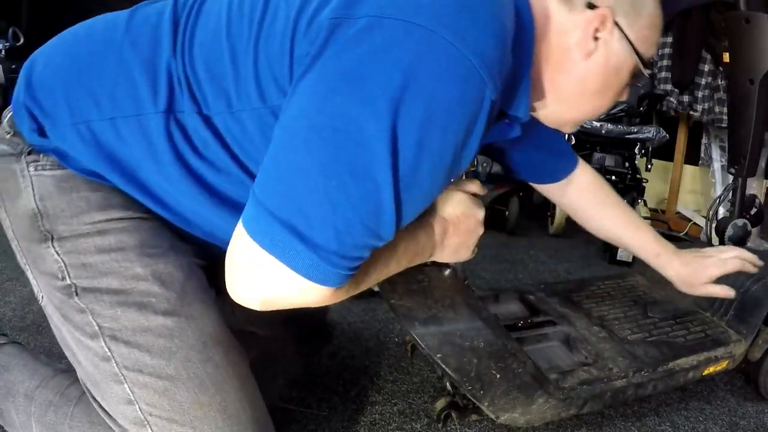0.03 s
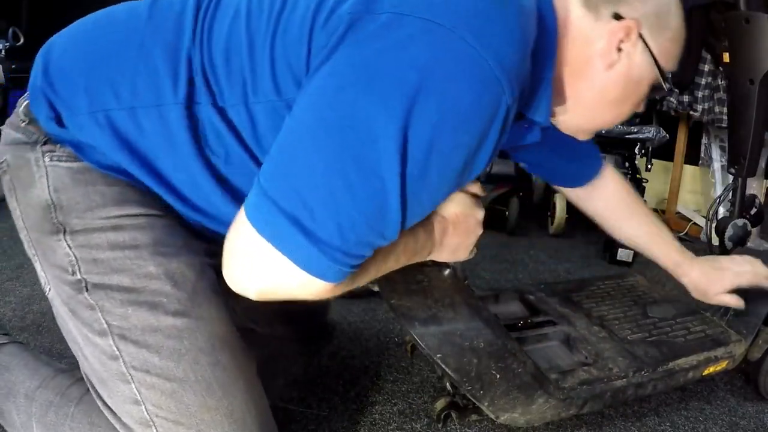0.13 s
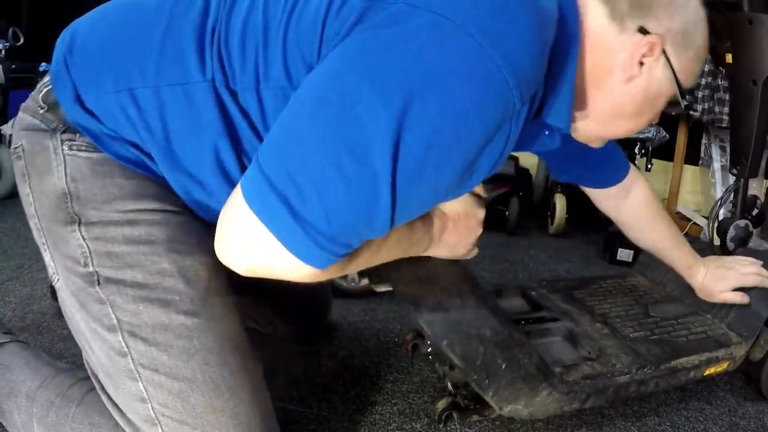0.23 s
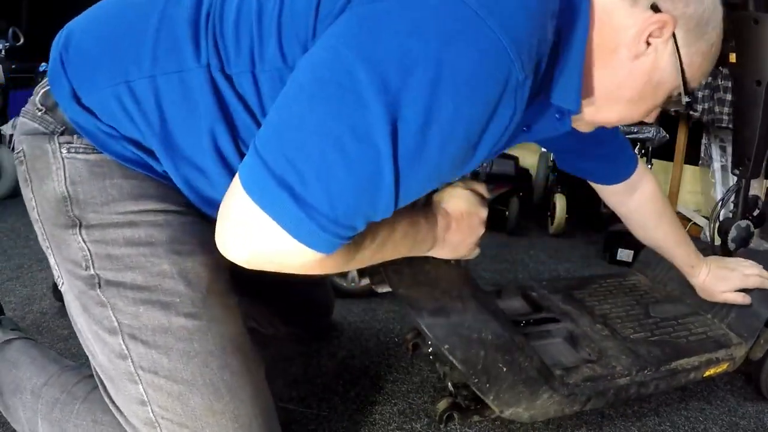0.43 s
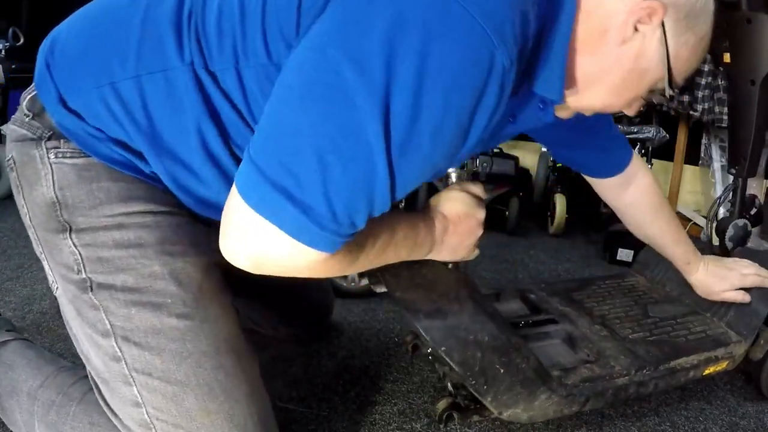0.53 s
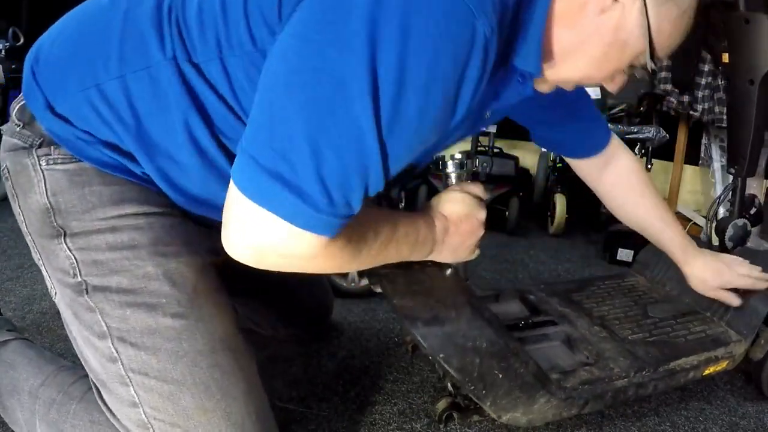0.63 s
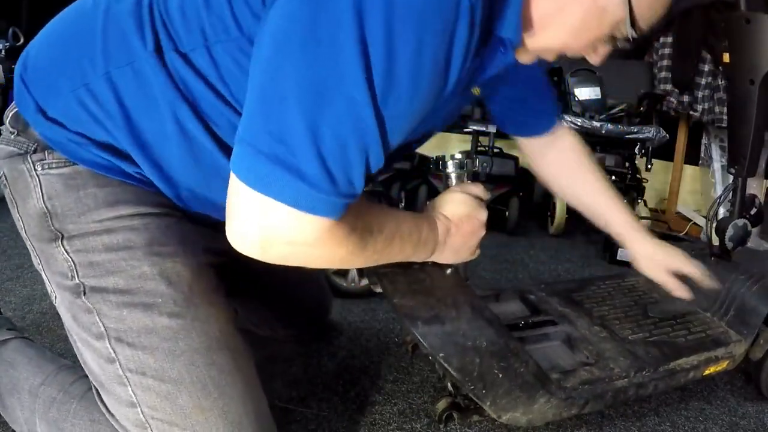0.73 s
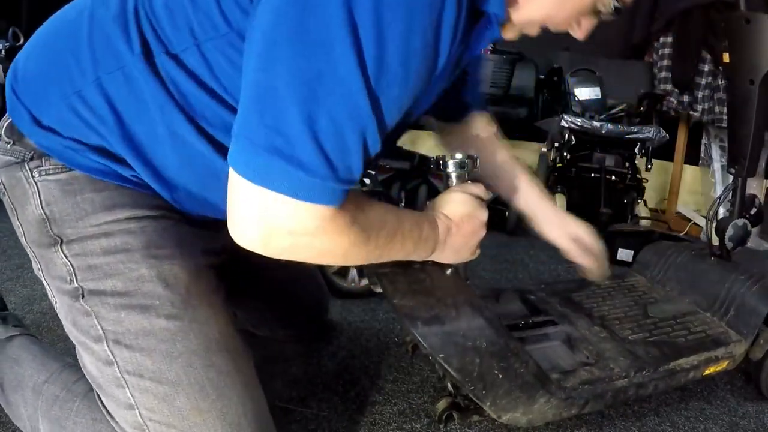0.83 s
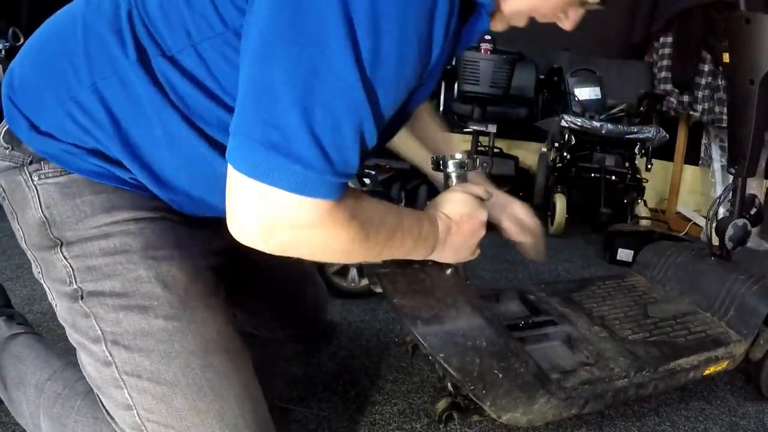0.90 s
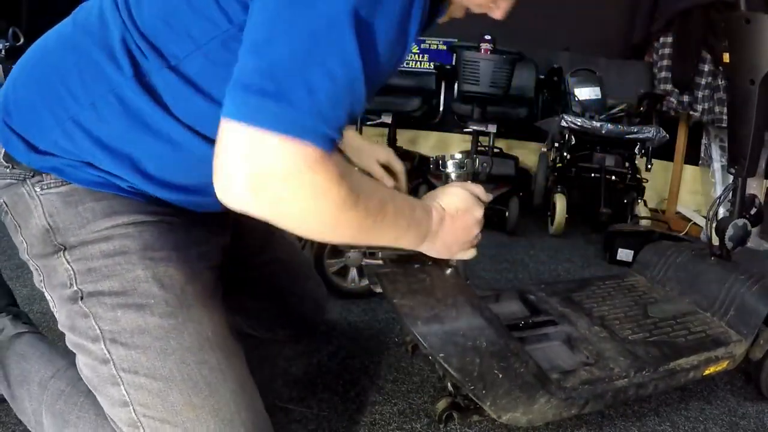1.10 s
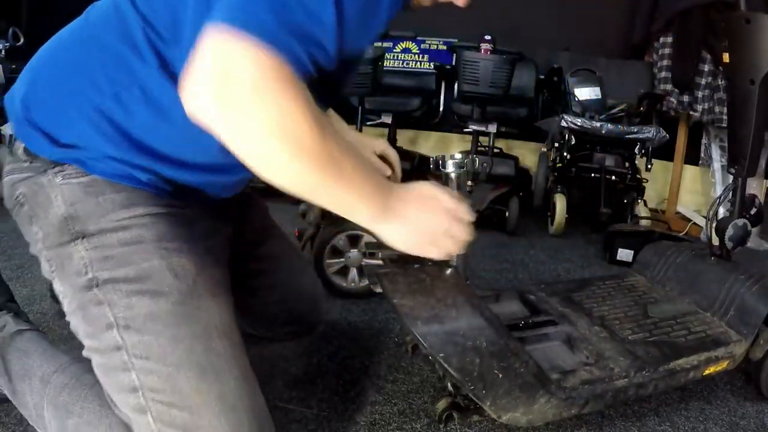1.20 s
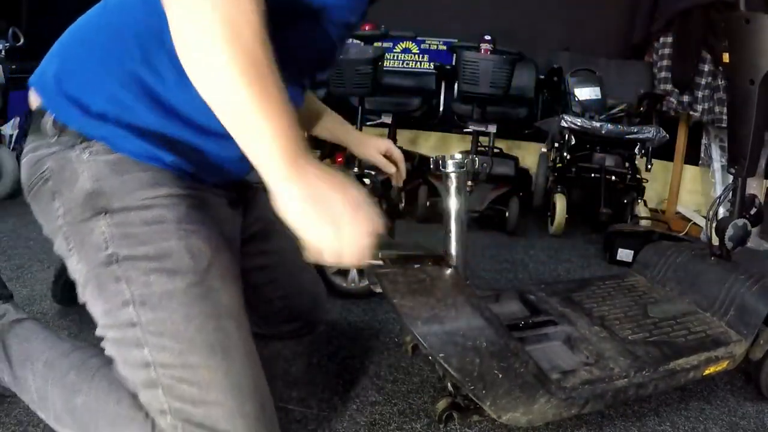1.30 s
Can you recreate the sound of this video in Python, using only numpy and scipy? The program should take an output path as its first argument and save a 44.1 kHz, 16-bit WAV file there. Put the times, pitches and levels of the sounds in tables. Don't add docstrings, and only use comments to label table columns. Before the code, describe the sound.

A loud, hard knock on a metal and plastic scooter deck at 0.23 seconds, with rapid rebounds, short hollow ringing, low wobble and rattling parts. Pins tick near 0.42; a latch clacks at 0.63. A hand swishes softly off rubber around 0.7, a tube drags faintly and seats with a dull thud at 1.09, then light nudges and cloth rustle. Close stereo, low workshop room noise.

```python
import sys
import numpy as np
from scipy import signal
from scipy.fft import rfft, irfft
from scipy.io import wavfile
from scipy.ndimage import uniform_filter1d

SR = 44100
rng = np.random.default_rng(int(sys.argv[2]) if len(sys.argv) > 2 else 0)


def waveform_to_disk(signal):
    frames = np.transpose(np.atleast_2d(signal))
    scaled = np.clip(frames, -1, 1) * 32767
    samples = np.round(scaled).astype(np.int16)
    wavfile.write(sys.argv[1], SR, samples)


def ratio_of_db(decibels):
    return 10 ** (np.asarray(decibels, float) / 20)


N = 59535

# start [s], strength [dB], hardness [dB/octave].
BLOWS = [(.2282, -13, 0.5), (.2297, -7.5, -2), (.234, -17, -1), (.2375, -20, 4), (.2475, -30, -1),
         (.2545, -20, 1), (.265, -14.5, -4.5), (.285, -36, -12), (.309, -54, -16), (.326, -26, -7.5),
         (.447, -40, -1), (.472, -36.5, -9)]
# frequency [Hz], spectrum [dB per Hz].
METAL_CRACK = [(300, -46), (700, 14.5), (1500, 18.5), (4500, -15), (9000, -39), (16000, -71)]
TIME_S = np.arange(N) / SR


def evened(x):
    return x / np.sqrt(np.mean(x ** 2) + 1e-20)


def read(points, hz):
    f, value = np.transpose(points)
    return np.interp(np.log(hz + 1), np.log(f + 1), value)


def coloured(x, points, tilt_db=0):
    hz = np.fft.rfftfreq(len(x), 1 / SR)
    gain_db = read(points, hz) + tilt_db * np.log2((hz + 60) / 1000)
    return evened(irfft(rfft(x) * ratio_of_db(gain_db), len(x)))


def ring(x, peaks):
    out = np.zeros(len(x))
    for hz, width_hz, db in peaks:
        r = np.exp(-np.pi * max(width_hz, 3) / SR)
        w = 2 * np.pi * hz / SR
        out += ratio_of_db(db) * signal.lfilter([(1 - r) * np.sin(w)], [1, -2 * r * np.cos(w), r * r], x)
    return out


def level(curve):
    s, db = np.transpose(curve)
    s = np.r_[s[0] - .03, s, s[-1] + .03]
    db = np.r_[-110, db, -110]
    return ratio_of_db(np.interp(TIME_S, s, db))


def gritty(per_s, spread_db):
    slips = rng.standard_normal(N) * (rng.random(N) < per_s / SR)
    return slips * ratio_of_db(spread_db * np.minimum(rng.exponential(1, N), 4))


def knocks(rows, modes, crack, crack_db, crack_s, rise_s, room_db, push=1, flip=1):
    out = np.zeros(N + SR)
    t = np.arange(SR // 2) / SR
    hz, width_hz, mode_db = np.transpose(modes)[:, :, None]
    sign = flip ** np.arange(len(hz))[:, None]
    decaying = np.exp(-np.pi * width_hz * t) * np.sin(2 * np.pi * hz * t)
    for s, db, hard_db in rows:
        spot_db = rng.standard_normal(hz.shape)
        size = sign * ratio_of_db(mode_db + spot_db + hard_db * np.log2(hz / 1000))
        body = (size * decaying).sum(0)
        body = push * body / abs(body).max()
        burst = coloured(rng.standard_normal(len(t)), crack, hard_db) * np.exp(-t / crack_s)
        at = round(s * SR)
        out[at:at + len(t)] += ratio_of_db(db) * (body + ratio_of_db(crack_db) * burst) * np.minimum(t / rise_s, 1)
    return out[:N] + ratio_of_db(room_db) * shop(out[:N])


def swelling_tones(rows, rise_s):
    s, db, hz, t60_s = np.transpose(rows)[:, :, None]
    t = np.maximum(TIME_S - s, 0)
    envelope = ratio_of_db(db - 60 * t / t60_s) * (1 - np.exp(-t / rise_s))
    return (envelope * np.sin(2 * np.pi * hz * t)).sum(0)


def deck_blow():
    # mode [Hz], width [Hz], level [dB].
    deck = [(154, 15, -10.5), (217.6, 24, 0.5), (265, 44, -5.5), (304, 8.6, -3), (371, 42, 5.5),
            (491, 37, -6), (724, 130, -26), (840, 100, -19), (930, 31, -33), (1687, 110, -6),
            (1950, 200, 3), (2280, 120, -22), (5860, 510, -18)]
    # frequency [Hz], spectrum [dB per Hz].
    deck_crack = [(300, -12), (600, 5), (2400, 1.5), (3200, 0), (6200, -6), (10000, -17), (16000, -38)]
    return knocks(BLOWS, deck, deck_crack, crack_db=-5.5, crack_s=0.0059, rise_s=0.00092,
                  room_db=-4.0, flip=-0.93)


def deck_wobble():
    # start [s], strength [dB], frequency [Hz], t60 [s].
    bounces = [(0.249, -2.5, 50.8, 0.2), (.2675, 3, 49.4, 0.033), (0.358, -11.5, 46, 0.25),
               (.405, -14, 47.8, 0.37), (0.497, -13, 49, 0.31), (0.586, -19, 44.6, 0.7),
               (0.676, -34, 37.3, 0.55), (0.732, -21, 50.4, 0.17), (0.787, -25, 40, 0.29),
               (0.918, -32, 37.1, 0.94), (1.093, -21.5, 39.3, 0.25), (1.146, -24.5, 73.8, 0.35),
               (1.301, -32.5, 57.7, 0.47)]
    return swelling_tones(bounces, rise_s=0.0087)


def loose_pings():
    # start [s], strength [dB], frequency [Hz], t60 [s].
    notes_struck = [(.2282, -6, 2300, 0.015), (.2285, -33, 4530, 0.017), (.2315, -18, 6030, 0.02),
                    (.232, -22, 4760, 0.024), (.2317, -13, 317, 0.043), (.232, -18.5, 1088, 0.061),
                    (.232, -20.5, 736, 0.13), (.2375, -22, 4520, 0.022), (.243, -9, 395, 0.088),
                    (.257, -20.5, 1950, 0.052), (.265, -25.5, 2750, 0.033), (.282, -34, 250, .1),
                    (.2345, -18, 270, 0.17), (.25, -24.5, 536, 0.16), (.27, -46, 626, 0.12),
                    (.233, -23, 2224, 0.036), (.236, -21, 1720, 0.053), (.352, -36, 400, 0.18),
                    (.4205, -40, 1866, 0.089), (.4225, -42, 2070, 0.032), (.4215, -40, 3210, 0.029),
                    (.431, -40.5, 2615, 0.048), (.432, -44.5, 4700, .04), (.4445, -44, 2040, 0.042),
                    (.4515, -40, 2340, 0.028), (.462, -36.5, 2600, 0.021), (.6335, -47, 2860, 0.026),
                    (.643, -34, 2780, 0.036), (.654, -30.5, 1520, 0.046), (.655, -29.5, 469.4, 0.16),
                    (.66, -38.5, 274, 0.11), (.585, -41, 174, 0.13), (.693, -38, 1550, 0.051),
                    (.696, -52, 3750, .04), (.711, -44, 4200, 0.056), (.713, -50, 1550, 0.084),
                    (.717, -45, 3920, 0.04), (.721, -49, 4150, 0.033), (.73, -47, 2720, .08),
                    (.8848, -40, 4320, 0.014), (.8848, -42.5, 3750, 0.016), (.885, -54, 2220, 0.027),
                    (.921, -51, 4200, 0.033), (.933, -52, 4080, 0.026), (.957, -58, 4220, 0.11),
                    (1.088, -48, 3390, 0.046), (1.089, -48, 2800, 0.038), (1.088, -59, 4650, 0.037),
                    (1.089, -46, 1053, 0.045)]
    return swelling_tones(notes_struck, rise_s=0.0018)


def rattle():
    # time [s], level [dB].
    shaking = [(.3, -22), (.36, -35.5), (.43, -35.5), (.46, -26.5), (.62, -48.5), (.67, -31), (.74, -33),
               (.79, -34), (.9, -41.5), (1.06, -58), (1.35, -49.5)]
    # resonance [Hz], width [Hz], level [dB].
    rattlers = [(71.5, 4.8, 12), (97.3, 20.6, 4.5), (154, 26, 2.5), (234, 6.9, -7), (306.5, 47, -4.5),
                (403, 45, -7.5), (483.7, 15, -1.5)]
    return level(shaking) * evened(ring(gritty(1500, 0.48), rattlers))


def latch_clack():
    # start [s], strength [dB], hardness [dB/octave].
    clacks = [
        (.6332, -17, -1),
        (.643, -43, 11),
        (.6525, -25.5, 11.5),
        (.6575, -23, -10),
        (.661, -28, -2),
        (.677, -35, -23),
    ]
    # mode [Hz], width [Hz], level [dB].
    latch = [(432, 38, -5.5), (668, 76, 2.5), (724, 35, -4.5), (1092, 89, -9), (1460, 21, -13),
             (1950, 37, -9.5), (2960, 190, -6.5), (3920, 230, -8)]
    return knocks(clacks, latch, METAL_CRACK, crack_db=-8.5, crack_s=0.0053, rise_s=0.00096, room_db=-6.5)


def tube_thud():
    # start [s], strength [dB], hardness [dB/octave].
    thuds = [
        (1.0872, -15, -1),
        (1.103, -34.5, -7.5),
        (1.118, -32.5, -4),
        (1.152, -29, -5),
        (1.327, -37.5, 5),
        (1.347, -30, 2),
    ]
    # mode [Hz], width [Hz], level [dB].
    seat = [(93, 19.7, 2), (146, 33, 2.5), (239.3, 14.7, -7), (315, 25, -5), (435, 54, -2.5),
            (1000, 145, -11), (1680, 300, -37), (2180, 200, -39), (2690, 110, -21.5), (3270, 120, -31)]
    # frequency [Hz], spectrum [dB per Hz].
    seat_crack = [(200, 15.5), (600, 8), (2000, -2), (5000, -11.5), (16000, -31)]
    return knocks(thuds, seat, seat_crack, crack_db=-18.5, crack_s=0.014, rise_s=0.0026,
                  room_db=-2.5, push=-1.16)


def metal_ticks():
    # start [s], strength [dB], hardness [dB/octave].
    ticks = [(.4203, -21.5, -6), (.4285, -29, 0), (.8853, -51, 5), (1.0886, -33.5, 0), (1.0945, -52, 7),
             (1.2745, -48, -7)]
    # mode [Hz], width [Hz], level [dB].
    pin = [(2050, 180, 0), (2800, 220, -3), (3450, 220, 0), (4250, 220, 0), (4850, 220, -3)]
    return knocks(ticks, pin, METAL_CRACK, crack_db=-14, crack_s=.004, rise_s=.0004, room_db=-4)


def mat_swish():
    # time [s], level [dB].
    swish = [(.52, -64.5), (.6, -49.5), (.66, -50), (.7, -42.5), (.735, -47), (.78, -60), (.82, -66)]
    # frequency [Hz], spectrum [dB per Hz].
    mat = [(600, -1.5), (1500, -6), (4000, -5.5), (9100, -11.5), (14000, -27), (16000, -36)]
    return level(swish) * coloured(gritty(6000, 1.2), mat)


def tube_drag():
    # time [s], level [dB].
    drag = [(.76, -67), (.84, -55), (.95, -54.5), (1.02, -55.5), (1.07, -52), (1.11, -59.5), (1.17, -84)]
    # frequency [Hz], width [Hz], level [dB].
    sleeve = [(1090, 130, -4), (1224, 50, 4), (1550, 81, -5), (2120, 69, -8.5), (3350, 97, -17),
              (4100, 200, -22)]
    sleeve_end = [(1045, 77, 5), (1370, 230, 4), (1620, 110, 2.5)]
    slips = gritty(8000, 1.2)
    home = np.interp(TIME_S, [0.97, 1.07], [0, 1])
    early = np.sqrt(1 - home) * evened(ring(slips, sleeve))
    late = np.sqrt(home) * evened(ring(slips[::-1], sleeve_end))
    return level(drag) * (early + late)


def cloth_rustle():
    # time [s], level [dB].
    rustle = [(1.1, -66), (1.176, -56.5), (1.35, -52.5)]
    # frequency [Hz], spectrum [dB per Hz].
    cloth = [(300, 1), (600, -9), (3000, -14), (10500, -24.5), (16000, -36)]
    return level(rustle) * coloured(gritty(7500, 1.9), cloth)


def metal_squeak():
    # resonance [Hz], width [Hz], level [dB].
    creep = [(4390, 25, 0), (5430, 25, 0), (7600, 40, -8)]
    start_s, length_s, squeak_db = .12, .09, -66
    u = np.clip((TIME_S - start_s) / length_s, 0, 1)
    envelope = np.sin(np.pi * u) ** 0.12
    return ratio_of_db(squeak_db) * envelope * evened(ring(rng.standard_normal(N), creep))


def hum():
    # frequency [Hz], width [Hz], level [dB].
    whine = [(8590, 53, 0)]
    return ratio_of_db(-77) * evened(ring(rng.standard_normal(N), whine))


def floor_mid():
    # frequency [Hz], spectrum [dB per Hz].
    spectrum = [(20, 0.5), (50, -3), (95, -13), (150, -22), (500, -30.5), (2300, -35), (5500, -38),
                (15000, -47)]
    return ratio_of_db(-45.5) * dulled(coloured(rng.standard_normal(N), spectrum))


def floor_side():
    # frequency [Hz], spectrum [dB per Hz].
    spectrum = [(20, -1), (200, -8.5), (500, -16), (14700, -23), (16000, -31)]
    return ratio_of_db(-61) * dulled(coloured(rng.standard_normal(N), spectrum))


def shop(x):
    # frequency [Hz], t60 [s].
    decay = [(100, 0.11), (300, 0.43), (1000, 0.45), (3000, 0.43), (8000, 0.36), (15000, 0.36)]
    taps = np.zeros(SR // 2 + 40)
    at = np.arange(200, SR // 2, 20)
    taps[at + rng.integers(0, 20, len(at))] = rng.choice([-1., 1.], len(at))
    hz, t, z = signal.stft(taps, SR, nperseg=256)
    fading = ratio_of_db(-60 * t / read(decay, hz)[:, None])
    tail = signal.istft(z * fading, SR, nperseg=256)[1]
    return signal.fftconvolve(x, tail / np.linalg.norm(tail))[:N]


def ports(mid):
    # frequency [Hz], side minus mid [dB].
    side_gain = [(40, -27), (130, -5), (290, -32), (640, -30), (1410, -31.5), (3100, -17.5), (6820, -9),
                 (13000, 1)]
    lock = 0.34
    i = np.arange(SR // 4)
    smear = rng.standard_normal(len(i)) * np.exp(-i / 1200)
    loose = rfft(signal.fftconvolve(mid, smear / np.linalg.norm(smear))[:N])
    side = 1j * lock * rfft(mid) + np.sqrt(1 - lock ** 2) * loose
    return irfft(side * ratio_of_db(read(side_gain, np.fft.rfftfreq(N, 1 / SR))), N)


def dulled(x):
    return irfft(rfft(x) * (np.fft.rfftfreq(N, 1 / SR) < 15300), N)


def scene():
    hits = deck_blow() + latch_clack() + metal_ticks() + dulled(tube_thud())
    rubbing = mat_swish() + tube_drag() + cloth_rustle() + rattle() + metal_squeak()
    pings = loose_pings()
    near = hits + dulled(rubbing) + deck_wobble() + pings
    mid = near + floor_mid() + hum() + ratio_of_db(-10) * shop(pings)
    side = ports(near) + floor_side()
    return np.array([mid + side, mid - side])


def low_pass(x):
    return signal.sosfilt(signal.butter(12, 16500, fs=SR, output="sos"), x)


def record(dry):
    lead_s, duck_db, limit = 0.016, -11.5, .9
    treble = signal.sosfiltfilt(signal.butter(2, 300, "high", fs=SR, output="sos"), dry)
    ahead_s = BLOWS[0][0] - TIME_S
    dip = uniform_filter1d(((ahead_s > .003) & (ahead_s < lead_s)) * 1., size=40)
    ducked = dry - treble * dip * (1 - ratio_of_db(duck_db))
    return low_pass(limit * np.tanh(ducked / limit))


dry = scene()
out = record(dry)
waveform_to_disk(out)
```